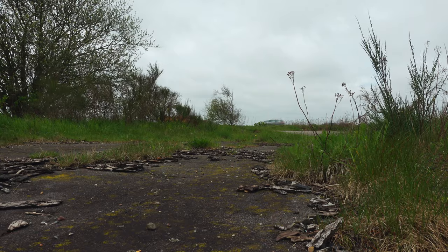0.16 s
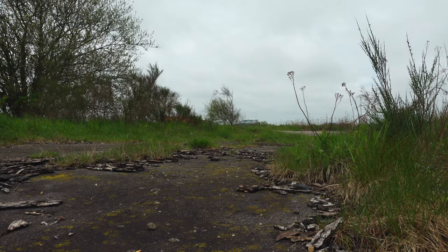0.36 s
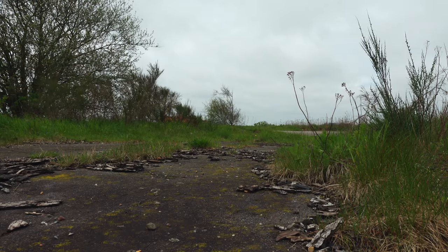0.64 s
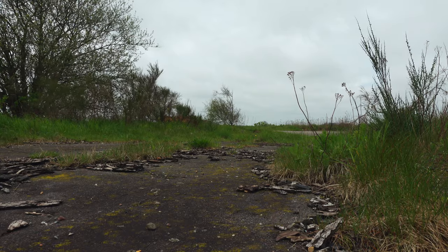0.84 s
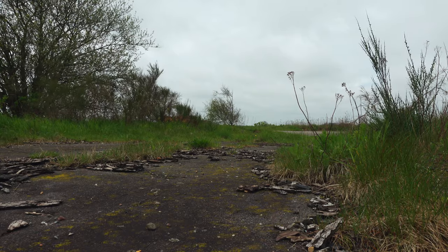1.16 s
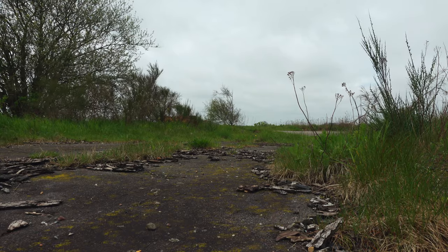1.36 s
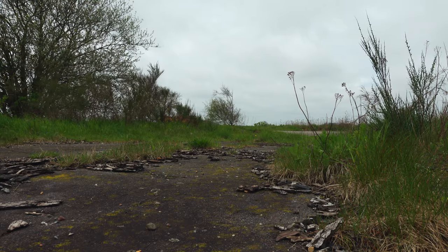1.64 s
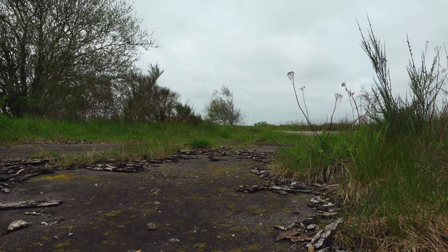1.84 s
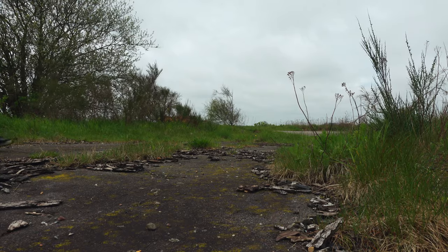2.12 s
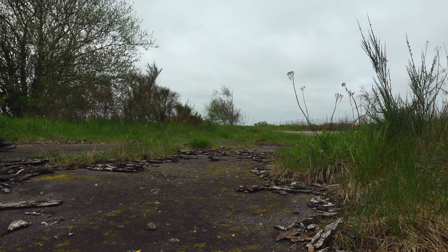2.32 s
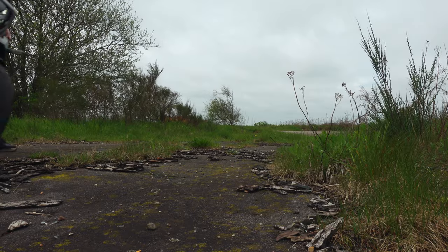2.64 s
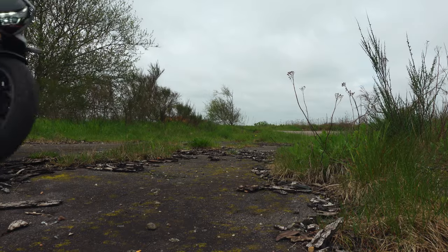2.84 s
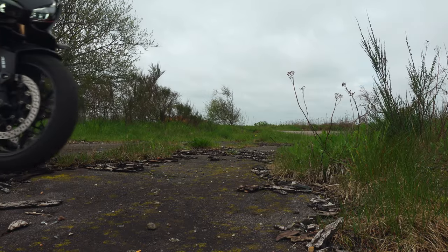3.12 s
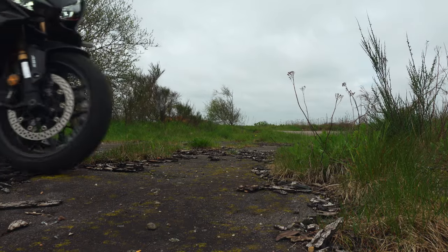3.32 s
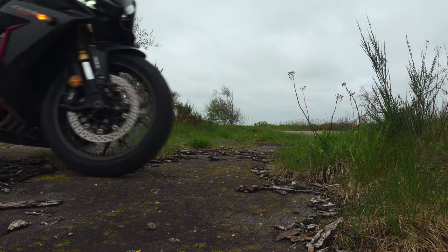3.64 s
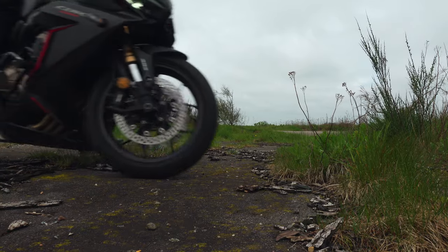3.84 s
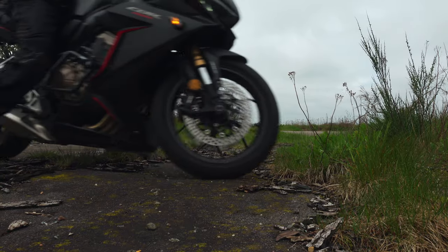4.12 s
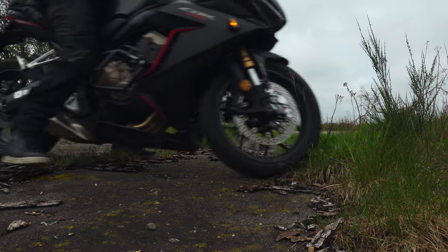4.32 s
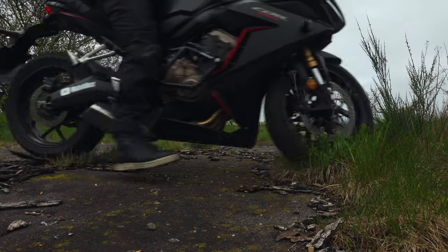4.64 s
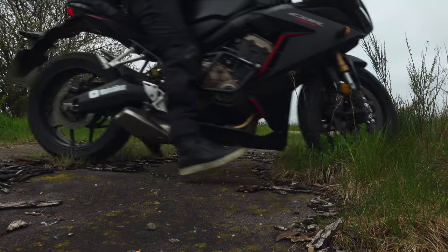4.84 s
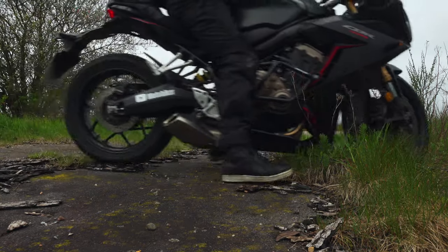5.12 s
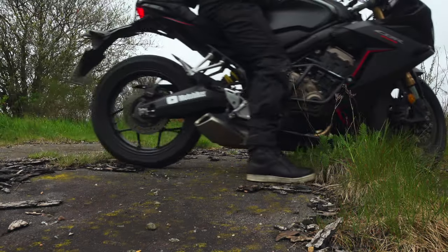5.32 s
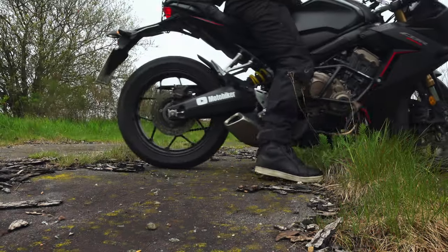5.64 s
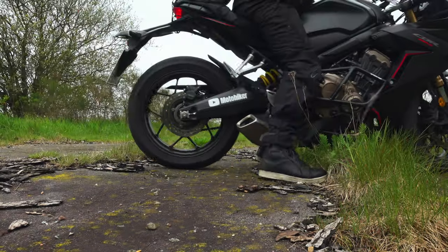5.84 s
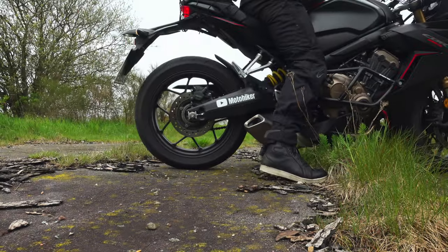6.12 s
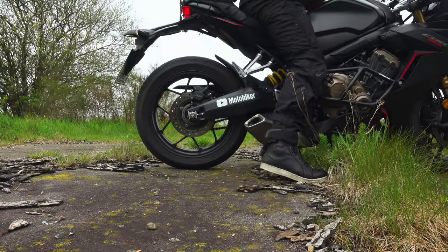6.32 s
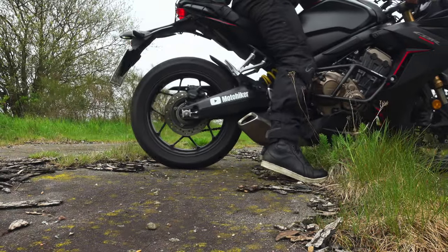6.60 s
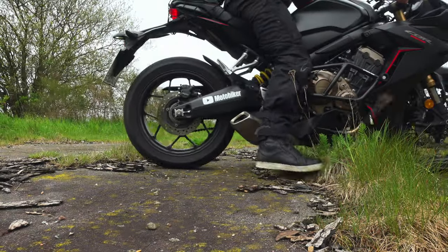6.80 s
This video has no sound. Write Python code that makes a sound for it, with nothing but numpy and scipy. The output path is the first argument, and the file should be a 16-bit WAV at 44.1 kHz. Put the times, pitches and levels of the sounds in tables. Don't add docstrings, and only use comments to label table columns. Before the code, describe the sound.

Glove rustle and switch clicks, thin electric whine, short gear-toothed cranking, then a motorcycle fires up and idles unevenly with ticking valves and brief birdsong.

```python
import sys
import numpy as np
from scipy import signal
from scipy.fft import rfft, irfft, next_fast_len
from scipy.io import wavfile

SR = 44100
rng = np.random.default_rng(int(sys.argv[2]) if len(sys.argv) > 2 else 0)


def wav_out(sig):
    wavfile.write(sys.argv[1], SR, np.round(np.clip(np.atleast_2d(sig).T, -1, 1) * 32767).astype(np.int16))


def elevation(decibels):
    levels = np.asarray(decibels, float)
    return 10 ** (levels / 20)


N = 307377
TIME = np.arange(N) / SR


def rms_one(x):
    return x / np.sqrt(np.mean(x ** 2) + 1e-20)


def in_time(rows, fade=0.0066):
    s, *columns = np.transpose(rows)
    gate = np.clip(np.minimum(TIME - s[0], s[-1] - TIME) / fade, 0, 1)
    return [np.interp(TIME, s, column) for column in columns] + [gate]


def drift(rate_hz):
    r = np.exp(-2 * np.pi * rate_hz / SR)
    wander = signal.lfilter([1], [1, -2 * r, r * r], rng.standard_normal(N + SR))
    return rms_one(wander[SR:])


def bump(centre_s, width_s):
    return np.exp(-.5 * ((TIME - centre_s) / width_s) ** 2)


def resonance(x, hz, width_hz):
    r = np.exp(-np.pi * max(width_hz, 5) / SR)
    zeros = np.array([1, 0, -1]) * (1 - r * r) / 2
    poles = [1, -2 * r * np.cos(2 * np.pi * hz / SR), r * r]
    return signal.lfilter(zeros, poles, x)


def body(x, modes):
    return sum((-1) ** k * elevation(db) * resonance(x, hz, width) for k, (hz, width, db) in enumerate(modes))


def coloured(x, spectrum):
    hz, db = np.transpose(spectrum)
    size = next_fast_len(N)
    bins = np.maximum(np.arange(size // 2 + 1) * SR / size, 1)
    gain = elevation(np.interp(np.log(bins), np.log(hz), db))
    return rms_one(irfft(rfft(x, size) * gain, size)[:N])


def butter(x, hz, kind, order=2):
    return signal.sosfilt(signal.butter(order, hz, kind, fs=SR, output="sos"), x)


# time in seconds, level in dB.
FACING = [(1.4, -1), (1.55, -5.5), (1.95, 3), (2.3, 4.5), (2.75, -3), (3.2, 6), (3.9, 6), (4.3, 6),
          (4.7, 0), (5.1, 1), (5.6, -2.5), (6.1, -7), (6.6, -6), (6.97, -14)]


def engine():
    per_s, facing_db = speed(), in_time(FACING)[0]
    turns = crank(per_s)
    octaves = np.log2(per_s / 42)
    running = np.clip((TIME - 1.344) / 0.021, 0, 1)
    bark_db = -2.5 + 13 * octaves + facing_db
    pipe = elevation(-19 + 5.5 * octaves) * exhaust(turns, bark_db)
    noise = elevation(-31 + 8 * octaves) * valve_train(turns, per_s, facing_db)
    return running * (pipe + noise)


# time in seconds, firings per second.
GOVERNED_SPEED = [(1.36, 44.19), (1.42, 69.24), (1.48, 79.69), (1.86, 65.04), (2.09, 57.03), (2.35, 43.66),
                  (3.33, 41.26), (3.44, 39.79), (3.67, 40.79), (4.2, 39.8), (4.43, 39.72), (4.51, 41.83),
                  (5.31, 42.43), (5.51, 44.72), (5.62, 44.05), (6.75, 46.33), (6.97, 48.87)]
# time in seconds, loss in dB.
MISFIRES = [(1.486, -6), (1.499, -13), (1.655, -3.5), (1.669, -16), (2.647, -5), (3.027, -19), (3.102, -4),
            (4.328, -29), (5.295, -7), (5.712, -7), (5.893, -14), (6.035, -2), (6.102, -7), (6.215, -6),
            (6.292, -17), (6.585, -11), (6.652, -26), (6.765, -16), (6.842, -8), (6.935, -3), (6.958, -8)]


def speed():
    sag_per_s, sag_s = 2.632, .06
    sag = 0
    for s, loss_db in MISFIRES:
        after = np.maximum(TIME - s, 0) / sag_s
        sag = sag + (1 - elevation(loss_db)) * after * np.exp(1 - after)
    return in_time(GOVERNED_SPEED)[0] - sag_per_s * sag


def crank(per_s):
    catch_s = 1.335
    return np.cumsum(per_s * (TIME > catch_s)) / SR - 2.13


# strength in dB, lateness in firings, extra drive of the higher silencer mode in dB.
CYLINDERS = [(2.5, 0.022, -1.5), (1.5, 0.017, 1), (3, -0.02, 1), (3.5, 0.0013, 0.5)]
# pitch in Hz, width in Hz, level in dB.
SILENCER = [(88.3, 32.9, 3.5), (121.1, 35.8, 3)]
# pitch in Hz, width in Hz, level in dB.
HEADERS = [(185.4, 47.6, -11.5), (255.7, 26.8, -10.5), (306, 62, -37.5)]


def exhaust(turns, bark_db):
    count = np.arange(-2, int(turns[-1]) + 1)
    strength_db, late, upper_db = np.array(CYLINDERS)[count % 4].T
    chance = rng.standard_normal((len(count), 3))
    strength_db = strength_db + .55 * chance[:, 0]
    for s, loss_db in MISFIRES:
        strength_db[count == np.floor(turns[round(s * SR)])] += loss_db
    at = np.searchsorted(turns, count + late + .006 * chance[:, 1])

    puffs = np.zeros((2, N + 1)) + 1e-18
    puffs[:, at] = elevation([strength_db, strength_db + upper_db + .9 * chance[:, 2]])
    puffs = puffs[:, :N]
    turbulence = butter(rng.standard_normal(N), 230, "low") * butter(puffs, 30, "low")
    flow = rms_one(butter(puffs, 399, "low", order=4)) + .13 * rms_one(turbulence)

    silencer = body(flow[0], SILENCER[:1]) - body(flow[1], SILENCER[1:])
    return_s = 0.01144
    headers = np.roll(body(flow[0], HEADERS), round(return_s * SR))
    return -rms_one(butter(silencer + elevation(bark_db) * headers, 32, "high", order=4))


# pitch in Hz, width in Hz, level at idle in dB, gain at high revs in dB.
CASING = [(580, 20.5, -0.5, 0), (639, 63, 2, -26), (695, 43, -3, 7.5), (770, 34, -23, 22),
          (900, 16, -15, 7), (1012, 33, 5.5, -4), (1110, 72, 6, -2), (1200, 37, -3.5, 0),
          (1563, 91, -9.5, 7), (1762, 71, -1.5, -1.5), (1937, 81, -7.5, 0), (2250, 81, -14.5, 7),
          (2464, 79, -9.5, 9.5), (2577, 86, -6, 1), (2715, 103, -4.5, 3), (2964, 63, -3, -1),
          (3170, 215, -4.5, 3.5), (3377, 96, -0.5, -3), (3460, 54, -1.5, -7), (3566, 57, -9.5, 2),
          (3800, 105, -5.5, 6), (4205, 120, -12, -7)]
# frequency in Hz, level in dB per Hz.
CLATTER = [(180, -3.5), (300, 1), (400, -10), (490, -15), (800, -13.5), (1400, -13), (2120, -17.5),
           (3100, -23.5), (4000, -13), (5000, -13), (8400, -22), (12000, -33), (15800, -46)]


def valve_train(turns, per_s, facing_db):
    throb_db = 1.76 * np.cos(2 * np.pi * (turns - .13))
    throb_db += 0.11 * np.cos(np.pi / 2 * turns + .8) + 0.96 * drift(54)
    ticks_per_s = 1200 * elevation(4.0 * np.cos(2 * np.pi * (turns - .1)))
    ticks = (rng.random(N) < ticks_per_s / SR) * elevation(3.1 * np.minimum(rng.exponential(1, N), 4))
    ticks = ticks * rng.choice([-1, 1], N)
    shake = rng.standard_normal(N) + 0.66 * rms_one(ticks)

    revs = np.clip((per_s - 45) / 22, 0, 1)
    flicker = [drift(17.5) for k in range(4)]
    panels = np.zeros(N)
    for k, (hz, width, db, gain_db) in enumerate(CASING):
        level_db = db + gain_db * revs + 2.0 * np.roll(flicker[k % 4], 9000 * k)
        panels += elevation(level_db) * resonance(shake * elevation(throb_db), hz, width)
    panels += (elevation(0.52 * facing_db) - 1) * butter(panels, (3280, 3520), "band", order=1)
    clatter = coloured(shake * elevation(0.39 * drift(28)), CLATTER)
    return rms_one(clatter + 0.79 * rms_one(butter(panels, 6340, "low")))


# multiple of the tooth rate, level in dB, share of a bite.
GEAR = [(1, -3, 1.0), (2, 0, 1.0), (3, -9, .7), (4, -9, .7), (5, -10, .5), (6, -9, .4), (7, -10, .4)]
# frequency in Hz, level in dB per Hz.
GRIND = [(180, -10), (300, -3), (477, -13), (958, -6), (1190, 1), (1890, -8), (2470, 0.5), (3160, -6.5),
         (8700, -10.5), (15800, -44)]
# time in seconds, boost in dB, width in seconds.
BITES = [(1.016, 5, .004), (1.04, 7, .004), (1.061, 5, .005), (1.077, 4, .004), (1.094, 4, .004),
         (1.113, 6, .005), (1.131, 6, .011), (1.205, 8, .005), (1.225, 10, .004), (1.294, 6, .005),
         (1.311, 7, .005)]
# time in seconds, peak in dB.
CHUFFS = [
    (1.11, -40),
    (1.2, -43),
    (1.285, -42),
]


def starter():
    grit = coloured(rng.standard_normal(N), GRIND)
    cranking = in_time([SPIN_UP[0], (1.36, 0, 0)], fade=0.0035)[-1]
    out = elevation(-34.5) * grit * cranking
    bite_db = 1.9 * sum(boost_db * bump(s, max(width, .0035)) for s, boost_db, width in BITES)
    waver = 1 + .02 * drift(140)
    sway_db = [(1 + .7 * k) * drift(70) for k, db, share in GEAR]

    for push, loaded_db in pushes():
        hz, whine_db, gate = in_time(push)
        grind_db = -29 + 0.66 * (whine_db + 23) + loaded_db
        phase = 2 * np.pi * np.cumsum(hz * waver) / SR
        whine = np.zeros(N)
        for (k, db, share), sway in zip(GEAR, sway_db):
            whine += elevation(db + sway + share * bite_db) * np.sin(k * phase + k * k)
        grind = grit * (1 + .5 * np.cos(phase))
        out += gate * (elevation(whine_db - 1) * whine + elevation(grind_db + 0.2 * bite_db) * grind)

    out += elevation(-6.5) * resonance(out, 2800, 320)
    breath = sum(elevation(db) * bump(s + .02, 0.029) for s, db in CHUFFS)
    return out + breath * rms_one(body(rng.standard_normal(N), SILENCER + HEADERS))


# time in seconds, tooth rate in Hz, effort in dB.
SPIN_UP = [
    (.96, 946, -59),
    (1.015, 1040, -32.5),
    (1.05, 1196, -30.5),
    (1.105, 1240, -30),
    (1.13, 1160, -22),
    (1.147, 1110, -23.5),
    (1.158, 1070, -51),
]
# start in seconds, length in seconds, tooth rate in and out in Hz, effort in dB.
PUSHES = [
    (1.192, .053, 1493, 1050, -30),
    (1.281, .049, 1500, 1150, -31),
]


def pushes():
    yield SPIN_UP, 0
    rise_s, fall_s, edge_db = 0.0061, 0.018, -24
    for s, length, in_hz, out_hz, db in PUSHES:
        at = np.linspace(0, length, 12)
        edge = np.maximum(1 - at / rise_s, 1 - (length - at) / fall_s)
        effort_db = db + edge_db * np.maximum(edge, 0)
        hz = in_hz + (out_hz - in_hz) * (at / length) ** 2.5
        yield np.c_[s + at, hz, effort_db], 7.5


# time in seconds, pitch in Hz, level in dB.
PUMP = [
    (.33, 3300, -80),
    (.37, 3600, -64),
    (.45, 3720, -61),
    (.7, 3720, -61),
    (.94, 3720, -61),
    (1.0, 3720, -80),
]
# multiple of the pitch, level early in dB, level late in dB.
PUMP_ORDERS = [(1, 2, -3), (2, 0, -10), (2.1, -10, 0), (3, -16, -8), (3.97, -19, -18), (.283, -3, -2)]


def pump():
    hz, level_db, gate = in_time(PUMP)
    phase = 2 * np.pi * np.cumsum(hz * (1 + 0.0075 * drift(250))) / SR
    built = np.clip((TIME - .55) / 0.17, 0, 1)
    tones = np.zeros(N)
    for k, early_db, late_db in PUMP_ORDERS:
        tone_db = early_db + built * (late_db - early_db) + 1.9 * drift(60)
        tones += elevation(tone_db) * np.sin(k * phase)
    return gate * elevation(level_db) * tones


# time in seconds, peak in dB, pitch in Hz,
# knock in dB, 30 dB decay in seconds.
CLICKS = [(.001, -14.5, 3320, -28.5, .012), (.02, -37, 1470, -30, 0.092), (.1205, -40, 7450, -50, .004),
          (.1471, -24.5, 3030, -27.5, 0.0074), (.181, -51, 8000, -53, .006), (.306, -41, 5000, -54, .009),
          (.6682, -33, 4530, -30, 0.0056), (.925, -40, 4500, -46, .006), (.931, -24.5, 2190, -28, .007),
          (.948, -16.5, 6500, -43, 0.022), (.953, -14.5, 4740, -38, 0.014), (.965, -25, 900, -38, 0.54),
          (1.388, -15.5, 8900, -60, 0.0086), (1.401, -15.5, 10600, -50, 0.0064),
          (5.237, -31, 11000, -70, .036), (5.679, -30, 11500, -64, .008)]
# time in seconds, peak in dB, pitch in Hz, knock in
# dB, 30 dB decay in seconds.
PINGS = [
    (.293, -35, 3600, -56, .013),
    (.324, -30, 1200, -35, .07),
    (.552, -40, 2600, -60, 0.014),
    (1.222, 0, 2480, -60, 0.023),
    (1.308, -14, 2500, -60, 0.038),
]


def clicks():
    out, t = np.zeros(N + 4096), np.arange(4096) / SR
    for table, share in (CLICKS, 1.34), (PINGS, 0.32):
        noises = rng.standard_normal((len(table), 4096))
        for (s, peak_db, hz, knock_db, t30), noise in zip(table, noises):
            width = min(share * hz, 6500)
            ring = rms_one(resonance(resonance(noise, hz, width), hz, width))
            burst = ring * elevation(-60 * t / max(t30, .002) / 2)
            knock = np.sin(2 * np.pi * 310 * t) * elevation(-60 * t / 0.024)
            at = round(s * SR)
            out[at:at + 4096] += elevation(peak_db - 7) * burst + elevation(knock_db) * knock
    return out[:N]


# start in seconds, length in seconds, pitch in and out in Hz, level in dB.
BIRDS = [
    (0.812, 0.082, 3420, 2900, -54),
    (1.453, 0.062, 2750, 2700, -31.5),
    (1.684, 0.053, 3950, 3700, -25),
    (1.865, 0.047, 2840, 2700, -32),
]


def birds():
    out = np.zeros(N)
    for s, length, in_hz, out_hz, db in BIRDS:
        slide = [(s, in_hz), (s + 0.72 * length, out_hz), (s + length, out_hz)]
        hz, gate = in_time(slide, fade=0.013)
        level = elevation(db + 0.5 + 2.1 * drift(60))
        out += gate * level * np.sin(2 * np.pi * np.cumsum(hz) / SR)
    return out


# time of the top in seconds, swell in seconds, level in dB.
RUSTLE = [
    (.12, 0.22, -45.5),
    (.27, .03, -58),
    (.47, .06, -56),
    (.56, .06, -56),
]


def rustle():
    level = 0
    for s, swell, db in RUSTLE:
        swell_db = 17 * (TIME - s) / swell
        release_db = 600 * (s - TIME)
        level = level + elevation(db + np.minimum(swell_db, release_db))
    grains = rng.standard_normal(N) * elevation(1.4 * drift(150))
    return level * rms_one(butter(grains, [2500, 10000], "band"))


# frequency in Hz, level in dB per Hz.
AIR = [(18, -41), (30, -4), (161, 2.5), (226, -4), (424, -4), (596, -8), (883, -3.5), (1660, -12.5),
       (1790, -12.5), (7580, -20.5), (15800, -41)]


def country_air():
    return elevation(-47 + 3.1 * drift(13)) * butter(coloured(rng.standard_normal(N), AIR), 46, "high")


def scene():
    bike = engine() + starter() + pump() + clicks()
    return (bike + birds() + rustle() + country_air())[None]


def band_limit(x):
    return signal.sosfilt(signal.butter(12, 16460, fs=SR, output="sos"), x)


def record(dry):
    rounded = dry / (1 + (np.abs(dry) / .9) ** 6) ** (1 / 6)
    mix = signal.sosfilt(signal.cheby2(18, 60, 15900, fs=SR, output="sos"), rounded)
    return band_limit(mix)


dry = scene()
out = record(dry)
wav_out(out)
```